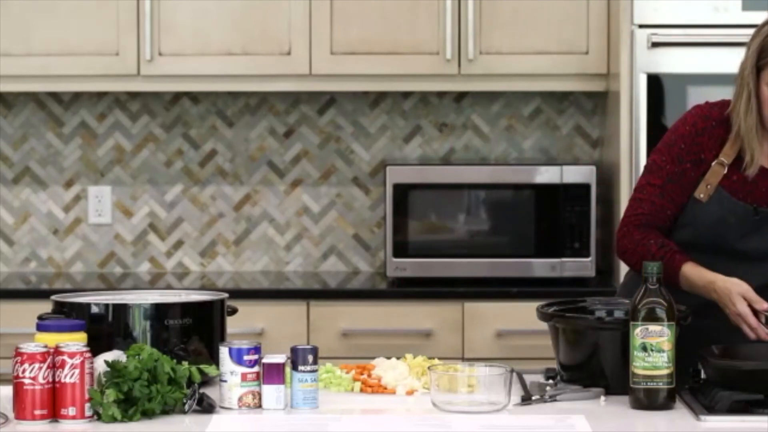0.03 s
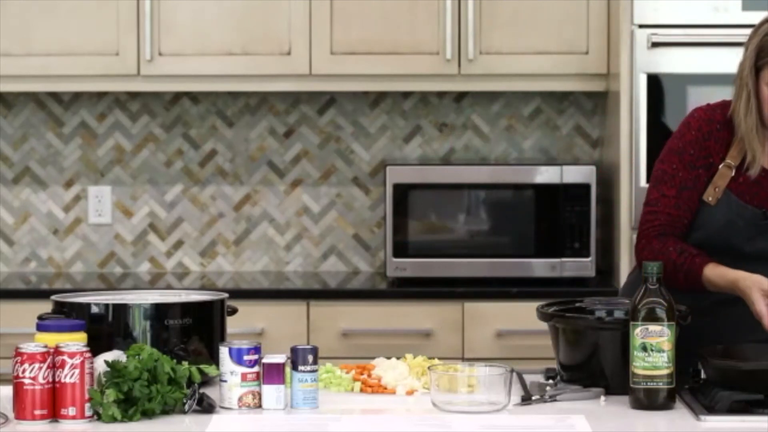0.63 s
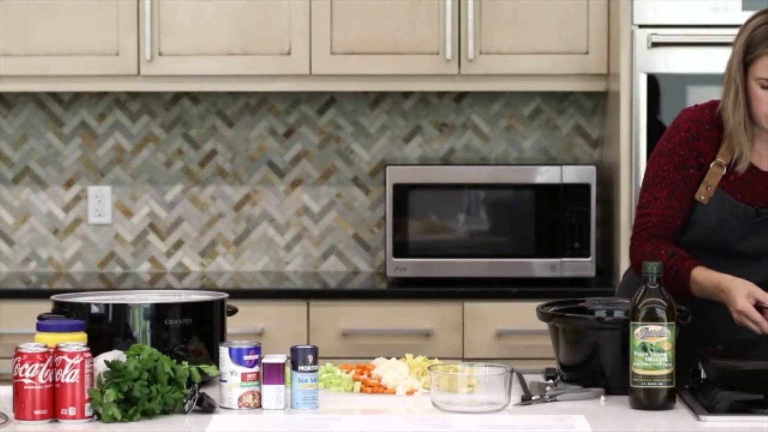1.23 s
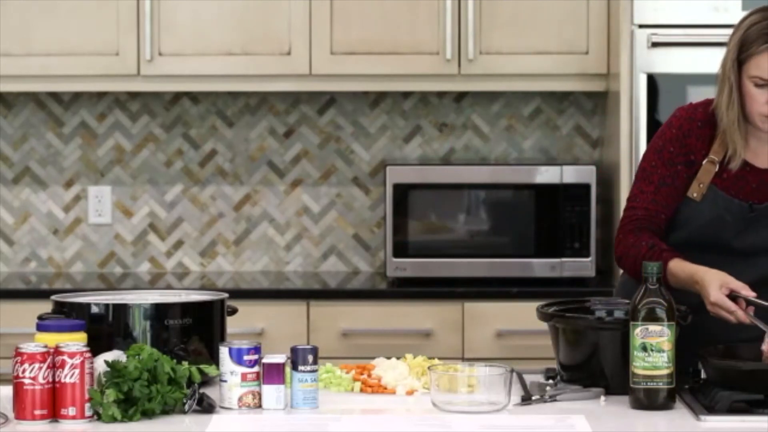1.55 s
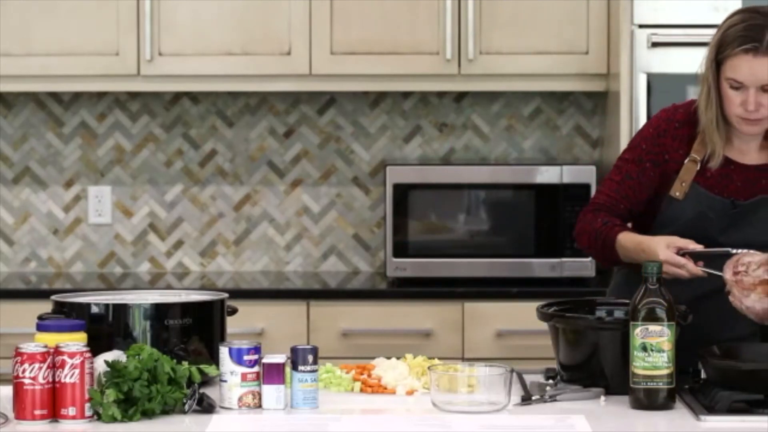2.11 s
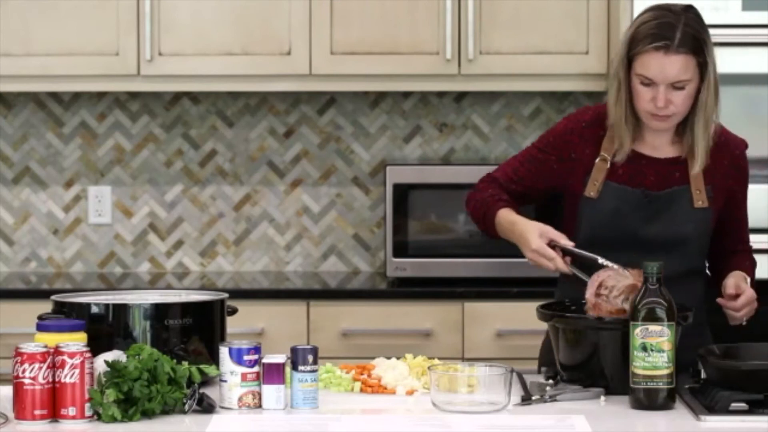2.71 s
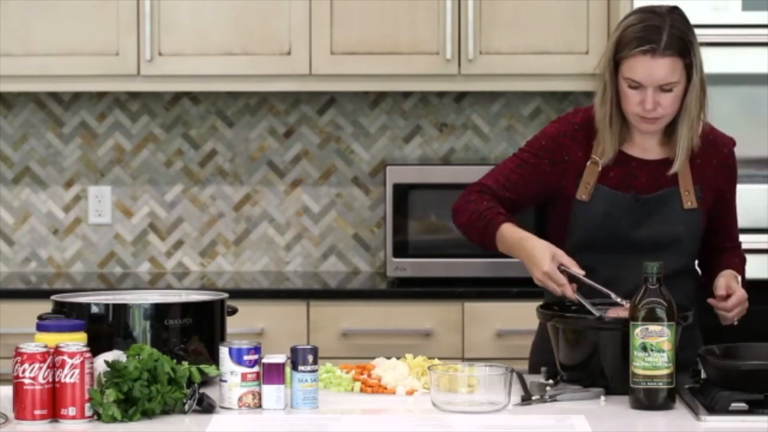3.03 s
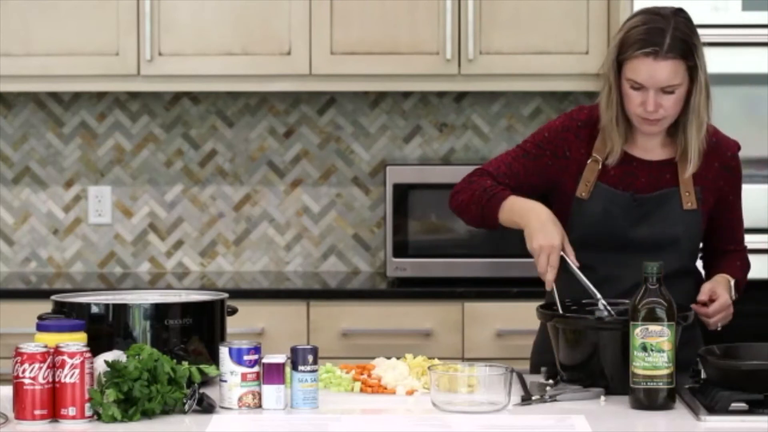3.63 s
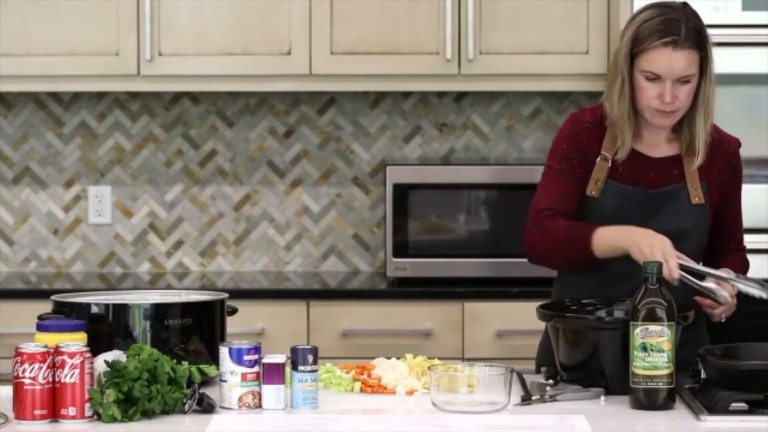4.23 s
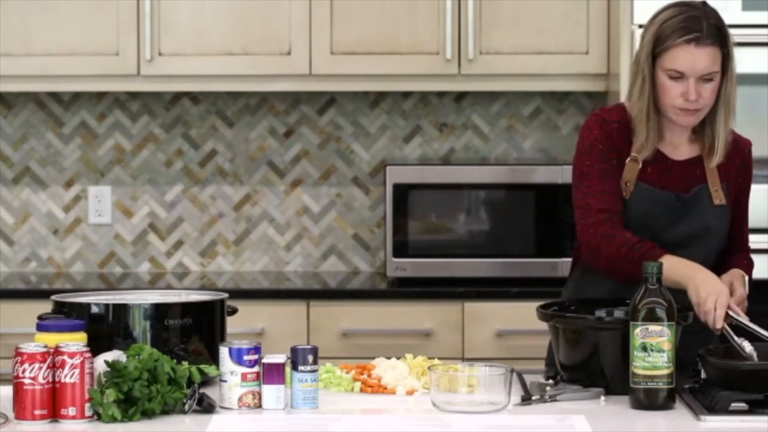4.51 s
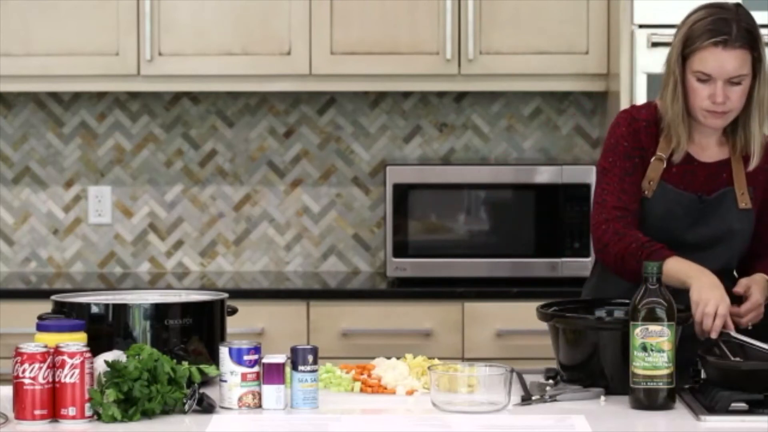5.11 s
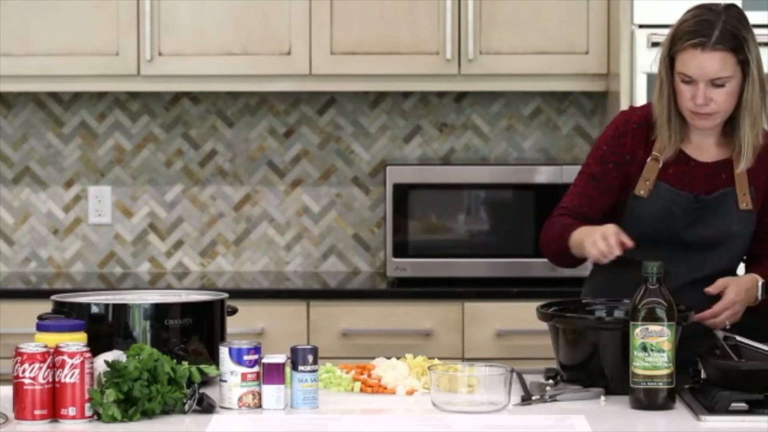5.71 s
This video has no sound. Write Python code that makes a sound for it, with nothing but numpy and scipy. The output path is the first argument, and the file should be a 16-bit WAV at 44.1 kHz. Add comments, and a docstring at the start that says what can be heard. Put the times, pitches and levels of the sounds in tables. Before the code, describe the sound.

In a kitchen, steel tongs scrape and tap softly around a faintly spitting frying pan. Meat then squelches into a slow cooker with wet crackles, and the tongs hit the ceramic in a loud, bright clash close to the microphone. A little farther off, they clank twice on the pan and are laid down in it, ringing it and rocking it on the stove. A sleeve swishes softly over steady ventilation.

```python
"""Steel tongs hit a ceramic slow cooker, close and hard enough to clip, while moving meat in a kitchen.
First they scrape around a spitting frying pan, then the meat squelches into the crock in wet crackles.
The tongs spring open against the crock: a short ceramic ring under a bright clash of steel.
They clank twice on the pan and are laid down in it, ringing it and rocking it on the stove.
A sleeve swishes softly over steady ventilation."""
import sys
import numpy as np
from scipy import signal
from scipy.fft import rfft, irfft
from scipy.io import wavfile

SR = 44100
rng = np.random.default_rng(int(sys.argv[2]) if len(sys.argv) > 2 else 0)


def store_wav(level_fs):
    """Save 16-bit WAV to argv[1]."""
    pcm = np.round(np.clip(np.atleast_2d(level_fs), -1, 1) * 32767)
    wavfile.write(sys.argv[1], SR, pcm.T.astype(np.int16))


N = 262395
TIME = np.arange(N) / SR
AGE = TIME[:SR]   # seconds since a blow
CUTOFF_HZ = 16000

# the tips chatter on the crock within a few milliseconds: start_s, clash_db
CROCK_HITS = [(3.5684, 5.5), (3.5713, -2.5), (3.5738, -3.5)]
# the ceramic's short clack and faint long ring: pitch_hz, level_db, t60_s
CROCK_MODES = [(110, -19, .025), (495, 3, .043), (1270, -19, .04), (2290, 6.5, .036), (3130, -3, .05),
               (3475, -7, .045), (3820, -8, .04), (4800, -7, .035), (5180, -1, .025), (5430, 1, .027),
               (5620, -1, .035), (6330, 1, .018), (7850, -10, .02), (468, -31, .42), (507, -31.5, .44),
               (2242, -38, .6), (2300, -36, .58), (3128, -44, .55), (5584, -35, .7), (5622, -37, .66)]
# bright, crowded overtones of the thin steel arms: frequency_hz, level_db
CLASH_COLOUR = [(120, -38.5), (900, -12), (1500, -4), (2700, -1.5), (3600, -2.5), (4800, 0), (6200, -3.5),
                (7800, -7.5), (11000, -12.5), (14000, -2), (16000, -15)]
def crock_hit():
    """The first touch rings the meat-damped ceramic and sets the tongs shimmering; every touch clashes."""
    out = np.zeros(N)
    tip_tilt = [(900, -14.5), (4500, 2.5), (10000, 6.5), (14000, -7.0)]   # thin tips sound brighter
    tips = [(hz, db + at_hz(tip_tilt, hz)) for hz, db in CLASH_COLOUR]
    ceramic = ring(*np.transpose(CROCK_MODES))
    shimmer = from_db(-28) * burst(tips, t60=0.13)
    add(out, CROCK_HITS[0][0], ceramic + shimmer)
    for s, clash_db in CROCK_HITS:
        add(out, s, from_db(clash_db) * burst(tips, t60=0.019))
    return out


def steel_arms(t60, count=500):
    """The springy arms ring in many scattered overtones; the high ones die sooner."""
    hz = rng.uniform(1200, CUTOFF_HZ, count)
    db = at_hz(CLASH_COLOUR, hz)
    start_rms = np.sqrt(np.sum(from_db(db) ** 2) / 2)
    return ring(hz, db, t60 / (1 + (hz / 9000) ** 2)) / start_rms


# tongs on the pan: start_s, ring_db, place (0 rim, 1 wall, 2 floor), clash_db, knock_db
PAN_HITS = [(0.597, -25, 0.19, -58, -50.5), (0.653, -32, 0, -43, -47), (0.819, -32, 0, -50, -51),
            (.863, -26.5, 1.5, -47, -58), (1.08, -49, 0.55, -67, -39.5), (4.6375, -3, 0.18, -7.5, -36.5),
            (4.7384, -1, 1, -5, -39.5), (4.745, -27, 1.5, -9.5, -61), (4.971, -15, 1.69, -19, -28),
            (5.003, -23, 1.17, -31, -44), (5.1403, -18.5, 2, -20, -30), (5.2317, -12.5, 1.7, -21.5, -31.5)]
# low ring of the heavy pan on the stove grate: pitch_hz, level_db, t60_s
GRATE_MODES = [(178, -9, .35), (250, -8, .3), (366, -7, .35), (470, -11, .4)]
# dull knock of the pan on the stove top: frequency_hz, level_db
KNOCK_COLOUR = [(70, -38.5), (170, -15.5), (400, 5.5), (560, -9), (1200, -15), (4000, -42)]
LIFT_S = 1.5   # the meat leaves the pan
def pan_clanks():
    """Each touch rings the pan according to its place, rattles the tongs and knocks the pan on the stove."""
    out = np.zeros(N)
    arms = steel_arms(t60=0.26)
    grate = ring(*np.transpose(GRATE_MODES))
    for s, ring_db, place, clash_db, knock_db in PAN_HITS:
        body = from_db(ring_db) * pan_ring(place, loaded=s < LIFT_S)
        clash = from_db(clash_db) * (burst(CLASH_COLOUR, t60=0.016) + from_db(-11.5) * arms)
        knock = from_db(knock_db) * (grate + from_db(-0.5) * burst(KNOCK_COLOUR, t60=0.5))
        contact_hz = 19460 * 2 ** (clash_db / 14.5)   # more bare steel, harder and brighter contact
        add(out, s, soften(body + clash, contact_hz) + knock)
    return out


# the frying pan's voice, by where it is struck: pitch_hz, rim_db, wall_db, floor_db, t60_s
PAN_MODES = [(420, -30, -37, -22, .55), (537, -33, -25, -24, .6), (614, -42, -31, -34, .35),
             (689, -48, -40, -27, 1.0), (1017, -7.5, -12, -17, .23), (1028, -29, -23, -17, .42),
             (1421, -42, -32, -25, .3), (1585, -17, -14, -8, .17), (1612, -30, -3.5, -13, .06),
             (1883, -24, -27, -16, .25), (1975, -21, -18, -16, .12), (2369, -3, -3, -9, .115),
             (2383, -28, -37, -28, .22), (2541, -22, -29, -25, .38), (2643, -42, -38, -21, .24),
             (2792, -32, -19, -29, .19), (3074, -40, -38, -28, .3), (3295, -32, -9, -31, .1),
             (3357, -19, -17, -29, .16), (3430, -32, -5, -25, .035), (3745, -33, -18, -23, .1),
             (3941, -38, -34, -27, .27), (4140, -28, -10, -20, .045), (4350, -27, -20, -36, .33),
             (4740, -21, -33, -28, .09), (5330, -24, -7, -28, .08), (5486, -18, -16, -22, .1),
             (5830, -26, -32, -26, .1), (6230, -28, -11, -28, .045), (8866, -46, -35, -43, .17)]
MUFFLE_DB, MUFFLE_HZ, MUFFLE_WIDTH_HZ, MUFFLE_T60_SHARE = 12, 2360, 150, 0.55
TWIN_SPLIT, TWIN_DB = .008, -11
def pan_ring(place, loaded):
    """Every mode beats against a weaker twin; meat in the pan shortens the ring and muffles one band."""
    hz, *_, t60 = np.transpose(PAN_MODES)
    db = np.array([np.interp(place, range(3), mode[1:-1]) for mode in PAN_MODES])
    if loaded:
        db = db - MUFFLE_DB * np.exp(-((hz - MUFFLE_HZ) / MUFFLE_WIDTH_HZ) ** 2)
        t60 = MUFFLE_T60_SHARE * t60
    twin_hz = hz * (1 + TWIN_SPLIT * rng.standard_normal(len(hz)))
    twins = ring(twin_hz, db + TWIN_DB, t60)
    return (ring(hz, db, t60) + twins) / np.hypot(1, from_db(TWIN_DB))


# the tongs push the meat about, and at last slide to rest against the pan's wall:
# start_s, length_s, friction_db, ring_db, resonance_hz
RUBS = [(-.08, 0.25, -59, -59.5, 1380), (0.35, 0.23, -55.5, -56, 1410), (0.595, 0.1, -48.5, -51, 3300),
        (0.683, 0.24, -49.5, -51, 1980), (0.947, 0.11, -48.5, -49.5, 2400),
        (1.044, 0.078, -53.5, -46.5, 1660), (1.204, 0.24, -51.5, -57, 2540),
        (1.522, 0.35, -57.5, -55, 2380), (5.309, 0.11, -56, -32.5, 2400)]
RUB_CREST = 0.64
def drag():
    """Dragged steel draws a muffled ring from the pan around the meat."""
    pressure = sum(from_db(db) * stroke(s, length, RUB_CREST) for s, length, _, db, _ in RUBS)
    return skipping(pressure, soften(pan_ring(place=1.49, loaded=True), hz=2260))


def scrape():
    """Friction is a gritty stream of small slips that also ring the tongs; each rub has a resonance."""
    slips = clumps() * grains(per_s=700, spread_db=2.2)
    arms = rms_one(signal.fftconvolve(slips, steel_arms(t60=0.089))[:N])
    friction = scrape_tone(slips + 0.59 * arms)
    out = np.zeros(N)
    for s, length, db, _, hz in RUBS:
        resonance = from_db(-2) * resonate(slips, hz, q=9.5)
        out += from_db(db) * stroke(s, length, RUB_CREST) * (friction + resonance)
    return out


# tongs sliding in the pan: frequency_hz, level_db
SCRAPE_COLOUR = [(500, -40), (880, 7), (1020, 14.5), (1300, 6.5), (1600, 4.5), (2000, -14), (2800, -1),
                 (3400, -2), (4200, 2), (5800, 0.5), (8000, -5.5), (16000, -15)]
def scrape_tone(slips):
    """Sliding steel has a nasal midrange under a gritty top; rms 1."""
    return colour(slips, SCRAPE_COLOUR)


SKID_START_S, SKID_ATTACK_S, SKID_HOLD_S, SKID_LENGTH_S = 5.124, 0.02, 0.084, 0.2
SKID_DB, SKID_FADE_DB_PER_S = -27.5, 78
def skid():
    """Laid down, the tongs chatter across the bare pan floor and fade until they lie still."""
    age = TIME - SKID_START_S
    fade_db = SKID_FADE_DB_PER_S * np.maximum(age - SKID_ATTACK_S - SKID_HOLD_S, 0)
    pressure = from_db(SKID_DB - fade_db) * np.clip(age / SKID_ATTACK_S, 0, 1) * (age < SKID_LENGTH_S)
    floor = soften(pan_ring(place=2, loaded=False), hz=5200)
    clash = from_db(-12) * soften(burst(CLASH_COLOUR, t60=0.035), hz=8800)
    return skipping(pressure, floor + clash)


def skipping(pressure, body):
    """Moving steel skips in many tiny contacts, each of which rings the body."""
    contacts = pressure * grains(per_s=1100, spread_db=2.5)
    return signal.fftconvolve(contacts, body / np.linalg.norm(body))[:N]


# the loudest wet snaps of meat and fat: start_s, level_db, centre_hz
WET_SNAPS = [(0.5542, -27.5, 4100), (.567, -36, 4200), (1.009, -48, 8000), (1.254, -38.5, 1520),
             (1.356, -39, 3000), (1.458, -46, 4860), (1.525, -38, 3580), (1.767, -53, 2600),
             (3.1024, -36, 4030), (3.1907, -40, 7250), (3.223, -30.5, 4900), (3.408, -39.5, 6240),
             (3.5348, -29, 5270)]
def wet_snaps():
    """Tiny films of fat and juice burst, each with a short click."""
    out = np.zeros(N)
    for s, db, hz in WET_SNAPS:
        hump = [(hz / 10, -26), (hz / 2, -7), (hz, 0), (hz * 2, -12), (hz * 4, -23)]
        add(out, s, from_db(db) * burst(hump, t60=0.013))
    return out


# swells of crackle as the meat sinks into the crock: start_s, length_s, level_db
SQUELCHES = [(2.835, 0.42, -56), (3.069, 0.054, -56.5), (3.148, 0.039, -52), (3.205, .085, -51),
             (3.36, 0.24, -65.5)]
# thin, wet tone of the crackle: frequency_hz, level_db
SQUELCH_COLOUR = [(1000, -21.5), (2200, -2), (5500, -3), (15900, -14)]
def squelch():
    """Tiny wet bubbles burst in clumps, each at one of many pitches."""
    pitches_hz = np.linspace(2000, 14500, 16)
    pops = clumps() * grains(per_s=4200, spread_db=2.5)
    pitch_index = rng.integers(0, len(pitches_hz), N)
    bubbles = sum(resonate(pops * (pitch_index == k), hz, q=6.0) for k, hz in enumerate(pitches_hz))
    swells = sum(from_db(db) * stroke(s, length, crest=0.95) for s, length, db in SQUELCHES)
    return swells * colour(bubbles, SQUELCH_COLOUR)


# pings of the tongs' hinge spring: start_s, peak_db, pitch_hz, t60_s
SPRING_PINGS = [(0.739, -35.5, 4700, 0.032), (4.077, -52, 4740, 0.081)]
def spring():
    """The spring slips in the hinge and sounds one short tone."""
    out = np.zeros(N)
    for s, db, hz, t60 in SPRING_PINGS:
        add(out, s, from_db(db) * np.sin(2 * np.pi * hz * AGE) * decay(t60))
    return out


def sizzle():
    """Hot fat spits crisp ticks, more with each rub, and calms down once the meat is lifted out."""
    pushing = sum(from_db(db) * stroke(s, length, RUB_CREST) for s, length, db, _, _ in RUBS)
    resting = from_db(-69.5) * stroke(0, 2 * LIFT_S, crest=0.3)
    ticks = resonate(grains(per_s=700, spread_db=1), hz=11100, q=0.57)
    return (resting + from_db(-16.5) * pushing) * ticks


# the sleeve brushes the apron as the arm swings: start_s, length_s, level_db, centre_hz
SWISHES = [(1.847, 0.42, -61, 3900), (2.37, 0.38, -54, 1600), (3.909, 0.4, -60, 4184),
           (4.202, 0.37, -53, 3420), (5.681, 0.3, -59, 2017)]
def sleeve():
    """Cloth fibres slip in a dense, soft stream while the arm moves."""
    fibres = soften(grains(per_s=13000, spread_db=3.0), hz=10400)
    return sum(from_db(db) * stroke(s, length, crest=0.49) * resonate(fibres, hz, q=1.0)
               for s, length, db, hz in SWISHES)


# dark bed of moving air: frequency_hz, level_db
AIR_COLOUR = [(10, 4.5), (40, -5), (80, 0.5), (150, -3.5), (290, -3), (420, -7), (560, -10), (770, -17),
              (1500, -24), (2200, -27), (5000, -31), (9500, -36.5), (16000, -40)]
# ventilation throb: pitch_hz, peak_db
THROB_TONES = [(6.8, -44), (24.1, -40.5)]
def ventilation():
    """Steady air noise over a deep throb."""
    throb = sum(from_db(db) * np.sin(2 * np.pi * (hz * TIME + rng.random())) for hz, db in THROB_TONES)
    return from_db(-47) * colour(rng.standard_normal(N), AIR_COLOUR) + throb


# the kitchen's short reverb tail: frequency_hz, t60_s
KITCHEN_DECAY = [(150, .5), (500, .55), (2000, .5), (5000, .48), (9000, .4), (13000, .26)]
def kitchen(x, wet_db, build_s):
    """Diffuse reflections build up, then die away, soonest in the treble."""
    white = rfft(rng.standard_normal(len(AGE)))
    hz = np.fft.rfftfreq(len(AGE), 1 / SR)
    tail = 0
    for centre, t60 in KITCHEN_DECAY:
        band = at_hz([(f, f == centre) for f, _ in KITCHEN_DECAY], hz)
        tail = tail + irfft(white * band, len(AGE)) * decay(t60)
    tail = tail * np.clip(AGE / build_s, 0, 1) ** 2
    return x + from_db(wet_db) * signal.fftconvolve(x, tail / np.linalg.norm(tail))[:N]


def cupboard_echo(x, delay_s, db):
    """One distinct bright reflection off the cupboard doors."""
    out = x.copy()
    treble = signal.sosfilt(signal.butter(1, 6000, "high", fs=SR, output="sos"), x)
    add(out, delay_s, from_db(db) * treble)
    return out


def ring(hz, db, t60):
    """A struck body radiates decaying tones that start at full swing, with alternating signs."""
    signs = (-1) ** np.arange(len(hz))
    tones = np.cos(2 * np.pi * np.outer(hz, AGE)) * decay(t60[:, None])
    return (signs * from_db(db)) @ tones


def burst(spectrum, t60):
    """Modes too crowded to tell apart: dying coloured noise."""
    return colour(rng.standard_normal(len(AGE)), spectrum) * decay(t60)


def decay(t60):
    """Fall by 60 dB every t60 seconds."""
    return np.exp(-np.log(1000) * AGE / t60)


def grains(per_s, spread_db):
    """Random clicks of uneven size; rms 1."""
    sizes = from_db(spread_db * np.minimum(rng.exponential(1, N), 4)) * rng.standard_normal(N)
    return rms_one(sizes * (rng.random(N) < per_s / SR))


def clumps(per_s=62, depth_db=2):
    """A gain that swells and sinks as surfaces catch and let go."""
    return from_db(depth_db * np.interp(TIME * per_s, np.arange(N), rng.standard_normal(N)))


def stroke(start_s, length_s, crest):
    """A movement builds up to its crest, a share of its length, and dies away."""
    return np.interp(TIME, start_s + length_s * np.array([0, crest, 1]), [0, 1, 0])


def resonate(x, hz, q):
    """Pass through one resonance; rms 1."""
    return rms_one(signal.lfilter(*signal.iirpeak(hz, q, fs=SR), x))


def soften(x, hz):
    """Second-order low-pass: a soft contact excites few high modes."""
    return signal.sosfilt(signal.butter(2, min(hz, .45 * SR), fs=SR, output="sos"), x)


def colour(x, spectrum):
    """Give a signal a spectrum; rms 1."""
    gain = from_db(at_hz(spectrum, np.fft.rfftfreq(len(x), 1 / SR)))
    return rms_one(irfft(rfft(x) * gain, len(x)))


def at_hz(points, hz):
    """Read a table on a log-frequency axis."""
    f, value = np.transpose(points)
    return np.interp(np.log(np.maximum(hz, 1)), np.log(f), value)


def from_db(db):
    """Decibels to gain."""
    return 10 ** (np.asarray(db) / 20)


def rms_one(x):
    """Scale to unit rms."""
    return x / np.sqrt(np.mean(x ** 2) + 1e-20)


def add(out, s, sound):
    """Mix a sound in at a time."""
    at = int(s * SR)
    out[at:at + len(sound)] += sound[:N - at]


def scene():
    """The crock is up close and nearly dry; the pan is farther off, with more room around it."""
    near = cupboard_echo(crock_hit() + wet_snaps() + spring(), delay_s=0.0083, db=-34.0)
    near = kitchen(near, wet_db=-24.0, build_s=0.013)
    far = pan_clanks() + drag() + skid() + scrape() + squelch() + sizzle()
    far = kitchen(far, wet_db=-15.5, build_s=0.0022)
    return (near + far + sleeve() + ventilation())[None]


def record(dry):
    """The hardest blows overload into soft clipping; a steep low-pass cuts the very top."""
    clipped = dry / (1 + np.abs(dry) ** 6) ** (1 / 6)
    return signal.sosfilt(signal.ellip(10, .1, 80, CUTOFF_HZ, fs=SR, output="sos"), 0.72 * clipped)


dry = scene()
out = record(dry)
store_wav(out)
```